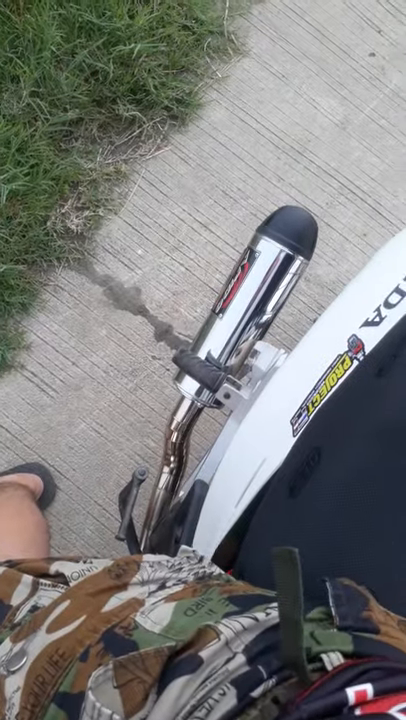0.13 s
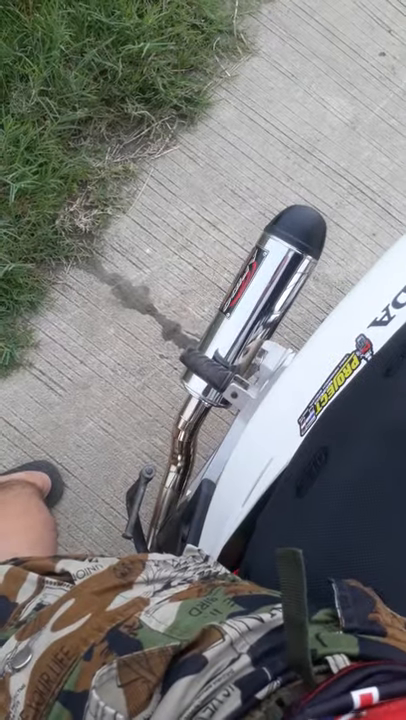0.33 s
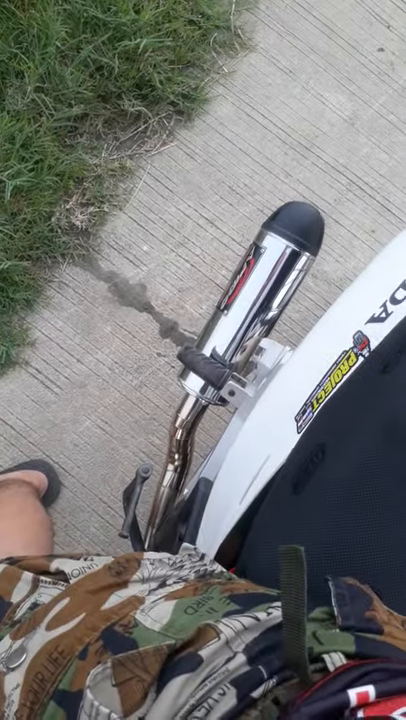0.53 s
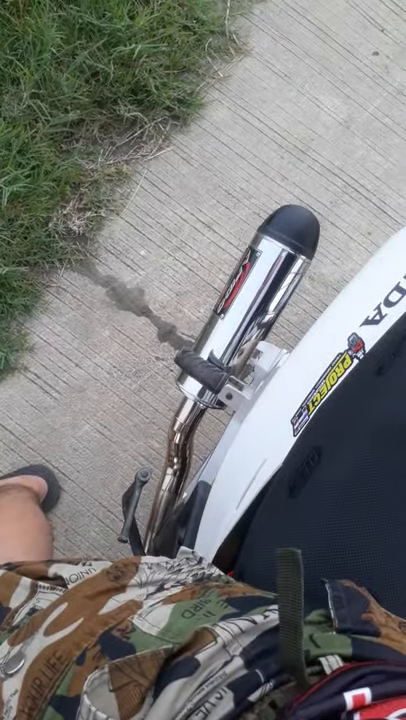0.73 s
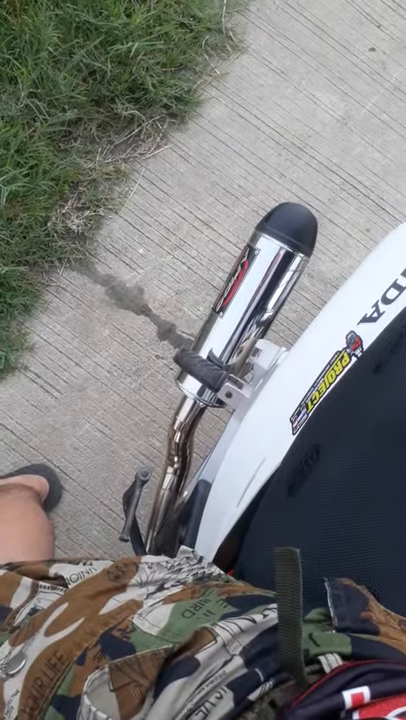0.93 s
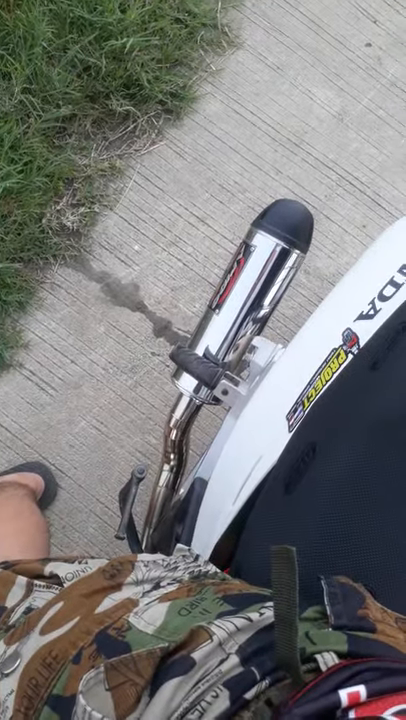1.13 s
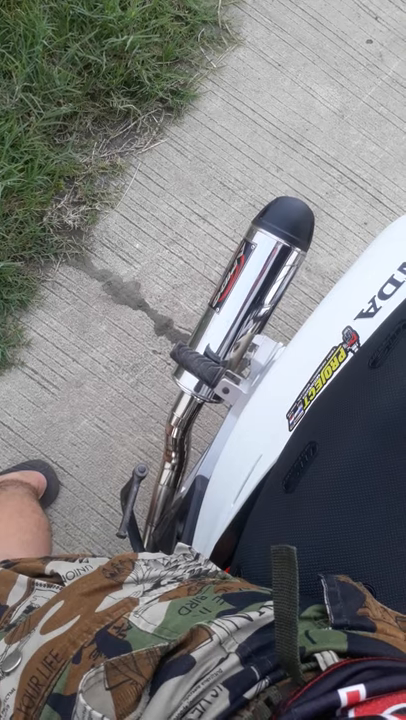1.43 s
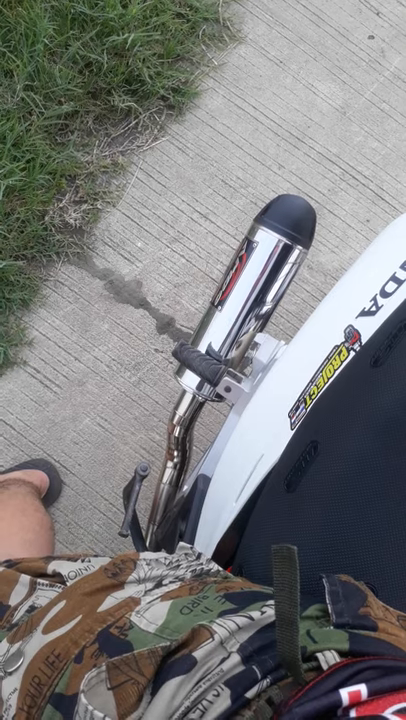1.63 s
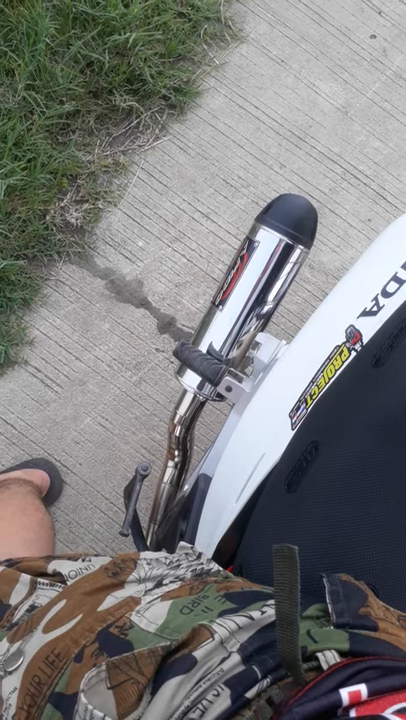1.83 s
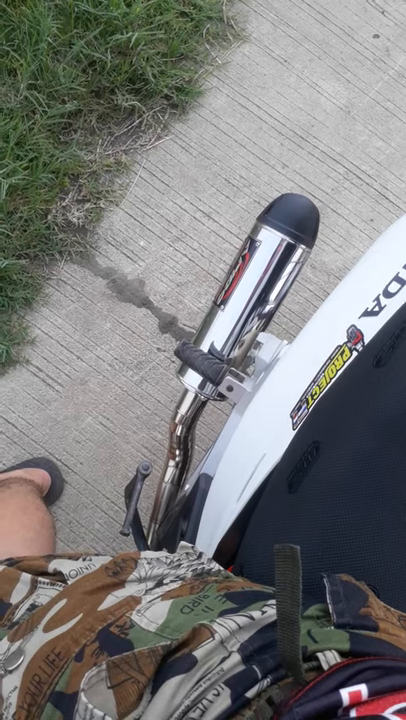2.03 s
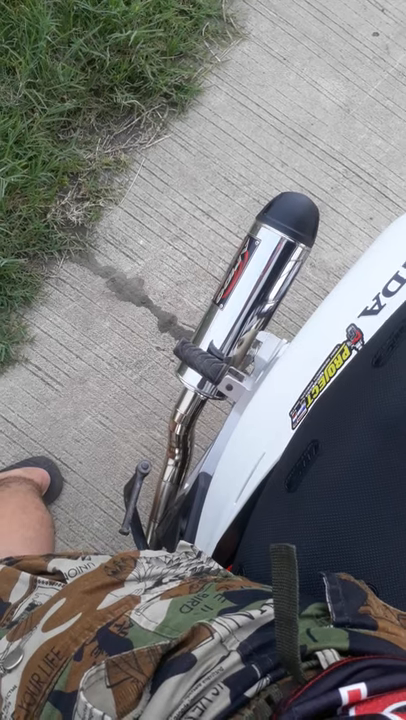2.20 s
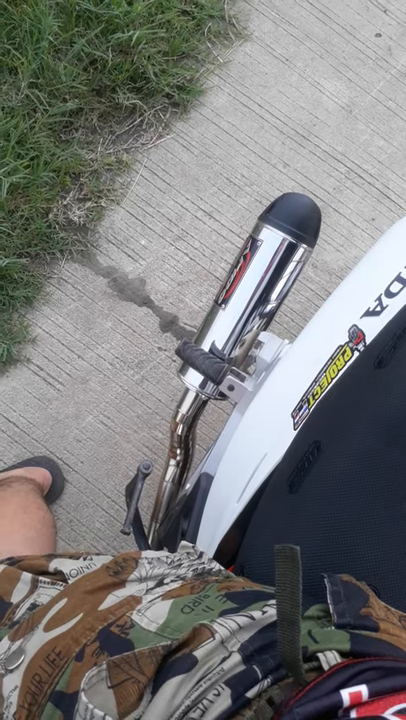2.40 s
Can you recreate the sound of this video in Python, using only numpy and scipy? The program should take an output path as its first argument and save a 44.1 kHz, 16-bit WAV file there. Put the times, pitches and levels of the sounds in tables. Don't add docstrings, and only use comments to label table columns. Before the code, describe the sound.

A single-cylinder motorcycle exhaust, very close and dry outdoors. From 0 to 0.1 seconds, the tail of a throttle blip thuds away over light valve clatter. From 0.1 to 0.6 the revs climb fast, puffs growing into loud, raspy cracks. From 0.6 to about 2.55 it bounces on the limiter, roughly six times a second, alternating duller puffs and sharp firing bursts, with soft microphone overload.

```python
import sys
import numpy as np
from scipy import signal
from scipy.fft import rfft, irfft
from scipy.io import wavfile
from scipy.ndimage import uniform_filter1d

SR = 44100
rng = np.random.default_rng(int(sys.argv[2]) if len(sys.argv) > 2 else 0)


def materialize(psi):
    bounded = np.clip(np.atleast_2d(psi).T, -1, 1)
    quanta = np.round(bounded * 32767).astype(np.int16)
    wavfile.write(sys.argv[1], SR, quanta)


def volts(x):
    e = np.asarray(x, float) / 20
    return 10 ** e


N = 112896
SIZE = 4096

# start_s, puff_db, ring_db, tick_db
BLIP_BEATS = [
    (.0078, -2.5, -8.5, -13.5),
    (.0293, 0, -6, -10),
    (0.0507, -4.5, -4.5, -11),
    (0.071, -13, -8.5, -41),
    (0.0929, -19, -16.5, -34),
]
# freq_hz, level_db
BLIP_PUFF = [(60, -8), (200, 3), (350, 4.5), (600, -4.5), (1000, -13), (2200, -25)]
# freq_hz, level_db (per Hz)
CLATTER_TONE = [(40, -11), (150, -4), (550, -3.5), (1000, -6.5), (1900, -12), (2700, -19), (6000, -25),
                (16000, -50.5)]
# time_s, level_db
CLATTER_LEVEL = [(0, -31), (.1, -34.5), (.25, -29.5), (.45, -28), (.62, -24.5), (2.56, -25)]
# centre_hz, width_hz, lift_db
SHELL = [(1620, 300, 4), (2100, 350, 5), (3500, 1300, 5), (8700, 900, 9)]
# multiple_of_cycle_rate, cut_db, firing_db, cut_lag_turns, firing_lag_turns
HUM_ORDERS = [(1, -32, -36, 0.22, 0.53), (2, -15, -14, 0.92, 0.69)]
# time_s, cycle_number
CLIMB_CYCLES = [(.1118, 0), (.1762, 3), (.2378, 6), (.2958, 9), (.3500, 12), (.4005, 15), (.4478, 18),
                (.4922, 21), (.5343, 24), (.5747, 27)]
# time_s, puff_db, crack_db, puff_pitch_share, hum_db
THROTTLE_OPENING = [
    (.1, -29, -37, 0.47, -6),
    (.17, -10, -48, 0.63, -8.5),
    (0.221, -3, -3.5, 0.67, -8),
    (.27, 0.5, 0.5, 0.83, -7.5),
    (.34, 3.5, 7, 0.87, -7.5),
    (.42, 1.5, 9.5, 0.83, -2),
    (.52, 1.5, 10.5, 0.77, 0.5),
    (.6, 1.5, 11.5, 0.78, 0),
]
# freq_hz, level_db
FIRED_PUFF = [(60, -16), (230, -7), (380, -4), (540, 0), (690, -4), (820, -10), (1100, -16), (2200, -25)]
# freq_hz, level_db
CRACK_TONE = [(300, -5), (1000, -2), (1700, -2.5), (2600, -6), (4200, -3.5), (6000, -13.5), (10000, -23),
              (16000, -22.5)]
# pitch_hz, level_db, t60_s
PIPE_MODES = [(192, -21.5, 0.03), (362, -22.5, 0.032)]
# time_s, level_db
PIPE_LEVEL = [(.1, 6.5), (.25, 4), (.4, 7), (.55, 3.5), (.62, -20)]
# pitch_hz, level_db, t60_s, start_s (after the dip)
FIRED_NOTES = [(1600, -17, .012, -.00047), (3600, -22, .007, .00016), (760, -18, .015, -.00095)]
LIMITER_TURNS = [.6135, .7566, .8083, .9508, .9897, 1.1195, 1.1583, 1.2884, 1.3274, 1.4574, 1.4964, 1.6266,
                 1.6654, 1.7957, 1.8474, 1.9900, 2.0289, 2.1589, 2.1978, 2.3279, 2.3668, 2.4974, 2.5619]
# freq_hz, level_db
COLD_PUFF = [(60, -44), (230, -5.5), (310, 0), (620, 1.5), (700, -8.5), (860, -14), (950, -14.5),
             (2200, -28.5)]
# pitch_hz, level_db, t60_s, start_s (after the dip)
COLD_SHELL_NOTES = [(1620, -21, .014, -.0001), (1120, -23, .04, -.0002), (2100, -24, .015, 0),
                    (840, -25, .04, .0003)]

LIMIT_HZ, SAG_HZ_PER_S, PULL_HZ_PER_S = 77, -29, 40
COLD_LAG_S = .0026
FIRED_DB, COLD_DB, PUFF_SPREAD_DB = 0, 1, .4
FIRED_AFTER, COLD_AFTER = .1, .25
FIRED_SKEW, COLD_SKEW = .45, 0
THUD_HZ, THUD_T60_S = 175, 0.057
TICK_HZ, TICK_T60_S, TICK_DB, TICK_QUICKER = 1700, 0.0045, 2, 3.4
CRACK_DB, COLD_CRACK_DB, CRACK_SPREAD_DB, COLOUR_DB = -15, -3, 1.5, 2.5
CRACK_LAG_S, CRACK_RISE_S, EVEN = .0002, .0006, .3
CRACK_T60_S, CRACK_TAIL_DB, TAIL_T60_S = 0.0062, -15.5, 0.018
CLATTER_THROB = 0.29
KICK_HZ, KICK_T60_S, KICK_DB, KICK_SPREAD_DB = 68, 0.13, -26.5, 4
CEILING, MIC_LOW_HZ, EDGE_HZ = 1.1, 55, 15900


def read(points, hz):
    f, value = np.transpose(points)
    return np.interp(np.log(hz + 1), np.log(f + 1), value)


def shell_db(hz):
    return sum(db / (1 + (2 * (hz - f) / width) ** 2) for f, width, db in SHELL)


def throttle(t, column):
    rows = np.array(THROTTLE_OPENING)
    return np.interp(t, rows[:, 0], rows[:, column])


def crank():
    knots, count = np.transpose(CLIMB_CYCLES)
    knots = np.append(knots, LIMITER_TURNS)
    steps = np.append(np.diff(count), [3, *np.round(np.diff(LIMITER_TURNS) * LIMIT_HZ)])
    mean = steps / np.diff(knots)
    mid = (knots[1:] + knots[:-1]) / 2
    stretch = np.arange(len(mid)) - len(CLIMB_CYCLES)
    spark = (stretch < 0) | (stretch % 2 == 1)
    drift = np.where(spark, PULL_HZ_PER_S, SAG_HZ_PER_S)
    slope = np.where(mid < LIMITER_TURNS[0], np.gradient(mean, mid), drift)
    t = np.arange(N) / SR
    k = np.clip(np.searchsorted(knots, t) - 1, 0, len(mid) - 1)
    u, span = t - knots[k], np.diff(knots)[k]
    bend = slope[k] * np.maximum(u, 0) * (u - span) / 2
    return np.append(0, np.cumsum(steps))[k] + mean[k] * u + bend


def cycles(turns):
    times = np.interp(np.arange(int(turns[-1]) + 1), turns, np.arange(N) / SR)
    fired = times < LIMITER_TURNS[0] + 1e-3
    for first, last in zip(LIMITER_TURNS[1::2], LIMITER_TURNS[2::2]):
        fired |= (times > first - 1e-3) & (times < last + 1e-3)
    return times, fired


def place(times, spectra):
    at = np.asarray(times) * SR
    turn = np.exp(-2j * np.pi * (at % 1)[:, None] * np.arange(SIZE // 2 + 1) / SIZE)
    sounds = np.fft.fftshift(irfft(spectra * turn), axes=1)
    out = np.zeros(N + 2 * SIZE)
    for n, sound in zip(at.astype(int), sounds):
        out[n + SIZE // 2:][:SIZE] += sound
    return out[SIZE:][:N]


def puffs(times, shape, db, share, skew, after):
    hz = np.fft.rfftfreq(SIZE, 1 / SR) / share[:, None]
    rolloff_db = 90 * np.maximum(np.log2(hz / 2300 + 1e-9), 0)
    z = volts(read(shape, hz) - rolloff_db) * np.minimum(hz / 60, 1) ** 2
    log = np.log(np.maximum(z, 1e-3))
    lag = signal.hilbert(np.hstack([log, log[:, -2:0:-1]])).imag[:, :z.shape[1]]
    z = -z * np.exp(1j * (skew - after * lag))
    wave = np.fft.fftshift(irfft(z), axes=1)
    dip = wave.argmin(1)[:, None] - SIZE // 2
    z = z * np.exp(2j * np.pi * dip * np.arange(z.shape[1]) / SIZE) / -wave.min(1)[:, None]
    return place(times, z * volts(db)[:, None])


def cracks(times, db, quick=1):
    t = (np.arange(SIZE // 2) / SR - CRACK_LAG_S) * quick
    hz = np.fft.rfftfreq(SIZE, 1 / SR)
    decay = volts(-60 * t / CRACK_T60_S) + volts(CRACK_TAIL_DB - 60 * t / TAIL_T60_S)
    shape = np.clip(t / CRACK_RISE_S, 0, 1) * decay
    z = rfft(rng.standard_normal((len(times), SIZE // 2)) * shape, SIZE)
    power = abs(z) ** 2
    z = z / (uniform_filter1d(power, size=41, axis=1) / np.mean(power)) ** (EVEN / 2)
    colour = uniform_filter1d(rng.standard_normal((len(times), len(hz))), 121, axis=1) * 11
    tone = volts(read(CRACK_TONE, hz) + shell_db(hz))
    tone = tone / np.sqrt(np.mean(tone ** 2))
    db = db + CRACK_SPREAD_DB * rng.standard_normal(len(times))
    return place(times, z * tone * volts(db[:, None] + COLOUR_DB * colour))


def ring(times, db, hz, t60, start=0.0016):
    t = np.arange(SIZE // 2) / SR
    note = volts(-60 * t / t60) * np.sin(2 * np.pi * hz * t)
    return place(times + start, rfft(note, SIZE) * volts(db)[:, None])


def blip_thuds():
    s, puff_db, ring_db, tick_db = np.transpose(BLIP_BEATS)
    x = ring(s, ring_db, THUD_HZ, THUD_T60_S)
    x += puffs(s, BLIP_PUFF, puff_db, 1 + 0 * s, FIRED_SKEW, FIRED_AFTER)
    x += ring(s, TICK_DB + tick_db, TICK_HZ, TICK_T60_S, 0.000895)
    return x + cracks(s + 0.00071, CRACK_DB + tick_db, TICK_QUICKER)


def clatter(turns):
    hz = np.fft.rfftfreq(N, 1 / SR)
    x = irfft(rfft(rng.standard_normal(N)) * volts(read(CLATTER_TONE, hz) + shell_db(hz)), N)
    s, db = np.transpose(CLATTER_LEVEL)
    throb = 1 + CLATTER_THROB * np.cos(2 * np.pi * (turns - .3))
    return x / x.std() * volts(np.interp(np.arange(N) / SR, s, db)) * throb


def crank_hum(turns, times, fired):
    t = np.arange(N) / SR
    on = np.interp(t, times, fired * 1.)
    x = np.zeros(N)
    for k, cut_db, firing_db, cut_lag, firing_lag in HUM_ORDERS:
        db = cut_db + (firing_db - cut_db) * on + throttle(t, column=4) * 2 / k
        lag = cut_lag + (firing_lag - cut_lag) * on
        x += volts(db) * np.cos(2 * np.pi * (k * turns - lag))
    return x * np.clip(t / 0.155, 0, 1)


def fired_cycles(times, spread):
    puff_db = FIRED_DB + throttle(times, column=1) + spread
    crack_db = throttle(times, column=2)
    x = puffs(times, FIRED_PUFF, puff_db, throttle(times, column=3), FIRED_SKEW, FIRED_AFTER)
    x += cracks(times, CRACK_DB + crack_db)
    pipe_db = np.interp(times, *np.transpose(PIPE_LEVEL)) + 3 * spread
    for hz, db, t60 in PIPE_MODES:
        x += ring(times, db + pipe_db, hz, t60)
    for hz, db, t60, start in FIRED_NOTES:
        x += ring(times, db + crack_db + 4 * spread, hz, t60, start)
    return x


def limiter_kicks(times):
    times = times[times > .45]
    db = KICK_DB + KICK_SPREAD_DB * rng.standard_normal(len(times))
    return ring(times, db, KICK_HZ, KICK_T60_S)


def cold_cycles(times, spread):
    x = puffs(times, COLD_PUFF, COLD_DB + spread, 1 + 0 * times, COLD_SKEW, COLD_AFTER)
    x += cracks(times, CRACK_DB + COLD_CRACK_DB + 0 * times)
    for hz, db, t60, start in COLD_SHELL_NOTES:
        x += ring(times, db + 4 * spread, hz, t60, start)
    return x


def scene():
    turns = crank()
    times, fired = cycles(turns)
    hot, cold = times[fired], times[~fired] + COLD_LAG_S
    spread = PUFF_SPREAD_DB * rng.standard_normal(len(times))
    exhaust = fired_cycles(hot, spread[fired]) + cold_cycles(cold, spread[~fired])
    exhaust += limiter_kicks(hot)
    engine = crank_hum(turns, times, fired) + blip_thuds() + clatter(turns)
    return (exhaust + engine)[None]


def top_cut(x):
    return signal.sosfilt(signal.butter(12, 16960, fs=SR, output="sos"), x)


def record(dry):
    held = dry / (1 + abs(dry / CEILING) ** 4) ** .25
    bass_cut = signal.butter(2, MIC_LOW_HZ, "high", fs=SR, output="sos")
    held = signal.sosfiltfilt(bass_cut, held)
    treble_cut = signal.firwin(511, EDGE_HZ, window=("kaiser", 9), fs=SR)
    limited = signal.oaconvolve(held, treble_cut[None], "same")
    return top_cut(np.clip(limited, -1, 1))


dry = scene()
out = record(dry)
materialize(out)
```